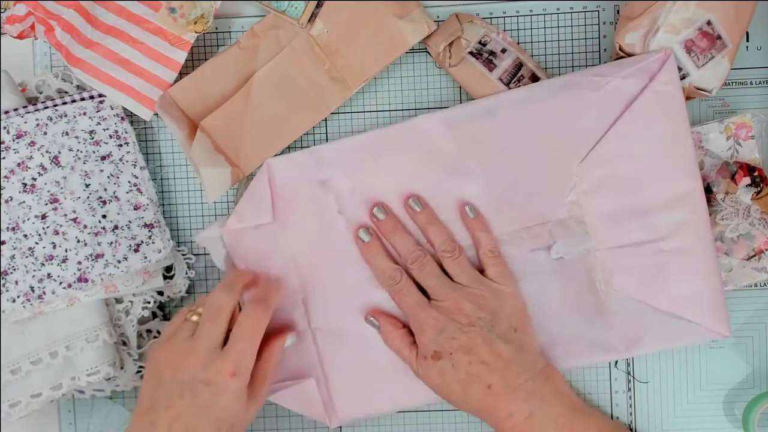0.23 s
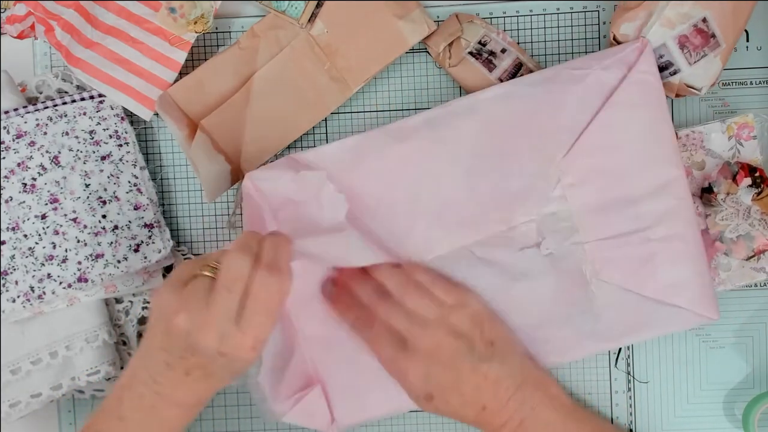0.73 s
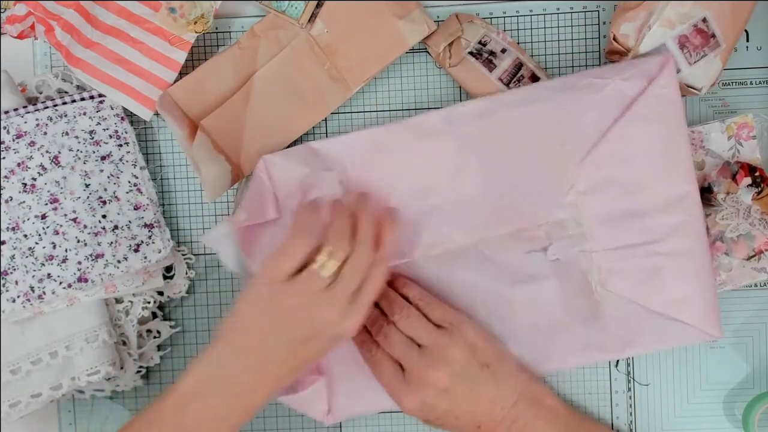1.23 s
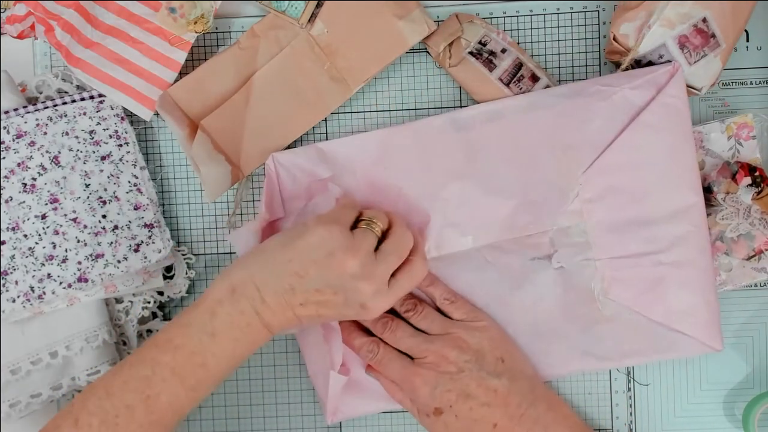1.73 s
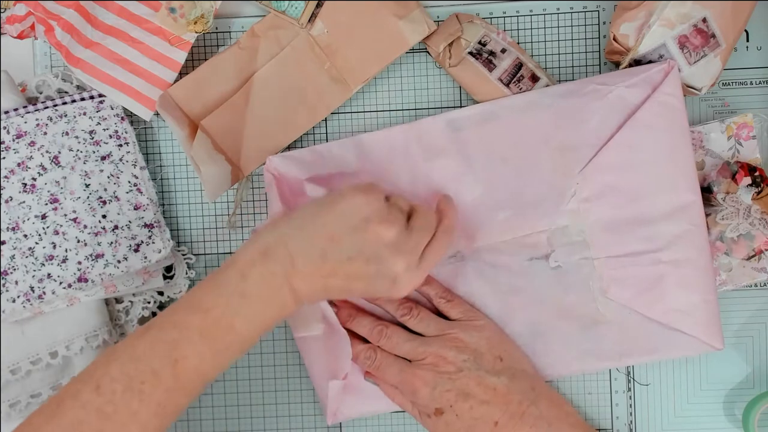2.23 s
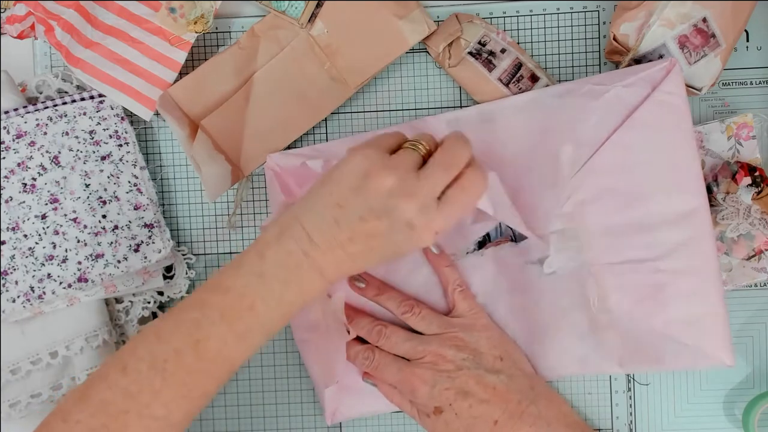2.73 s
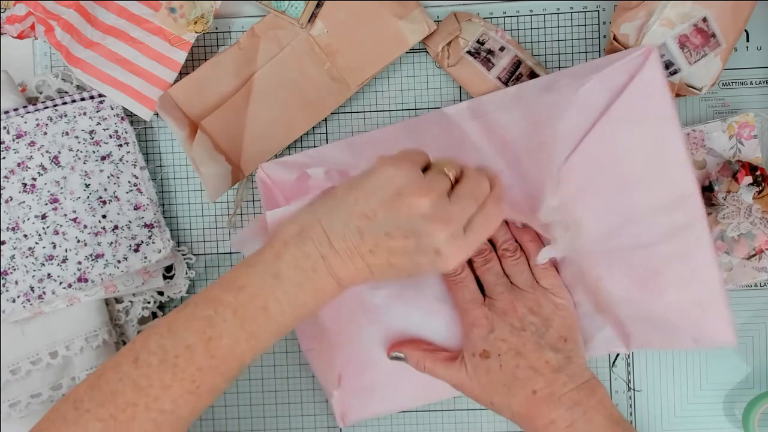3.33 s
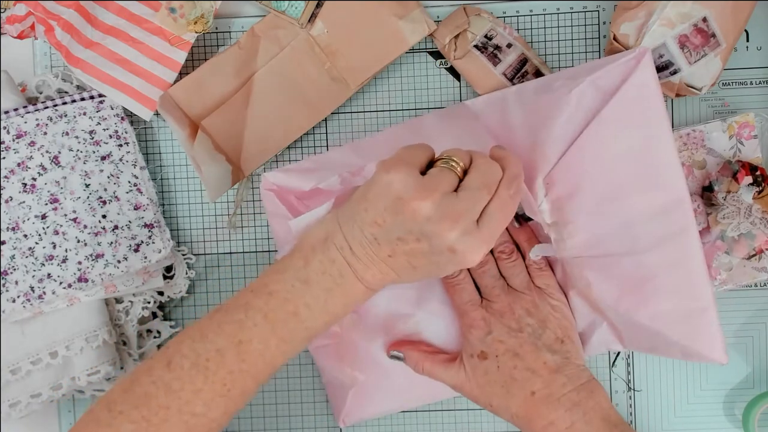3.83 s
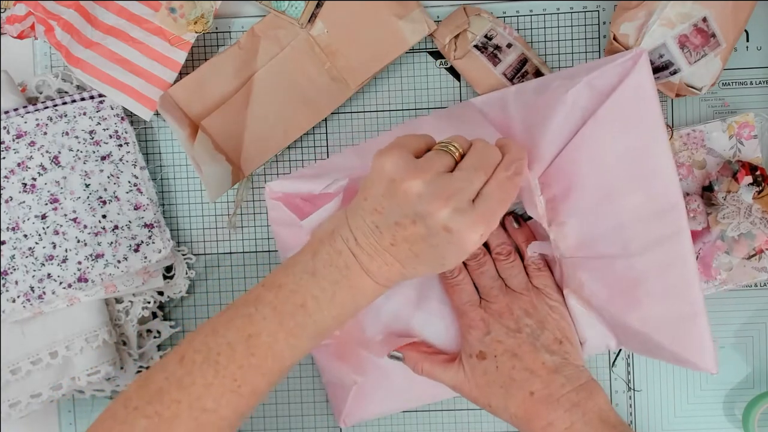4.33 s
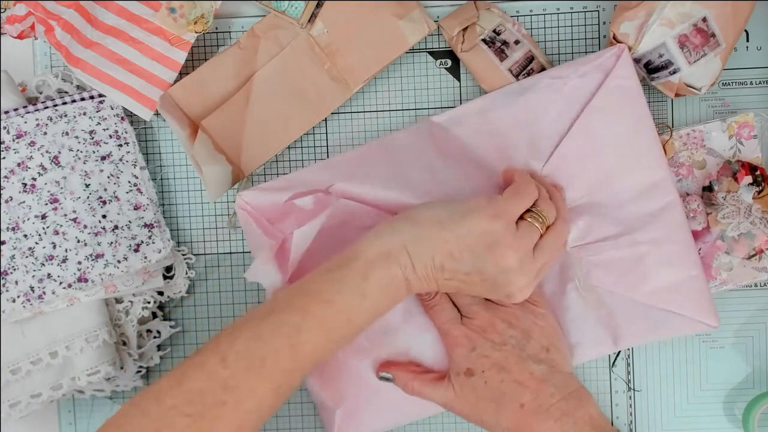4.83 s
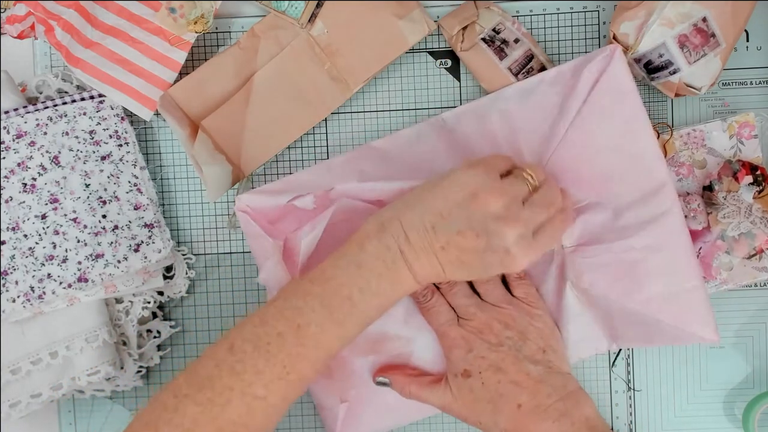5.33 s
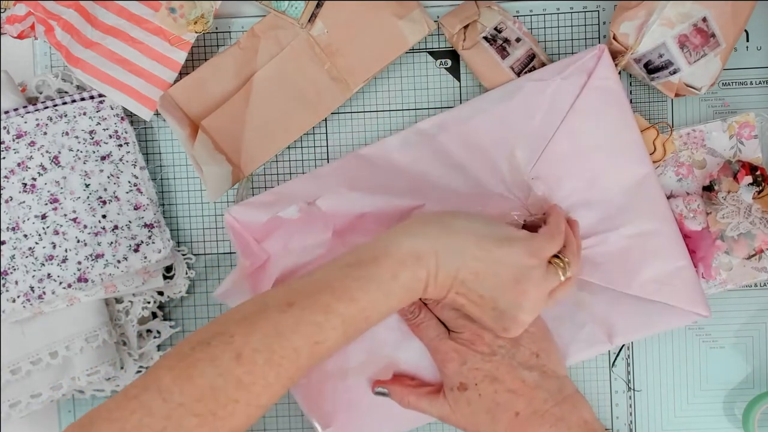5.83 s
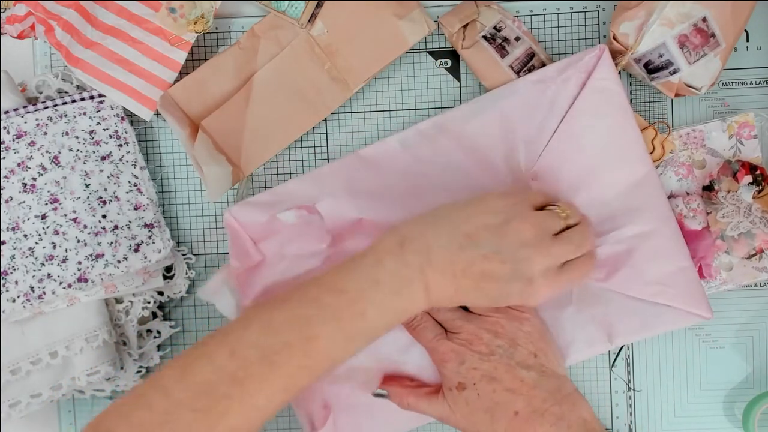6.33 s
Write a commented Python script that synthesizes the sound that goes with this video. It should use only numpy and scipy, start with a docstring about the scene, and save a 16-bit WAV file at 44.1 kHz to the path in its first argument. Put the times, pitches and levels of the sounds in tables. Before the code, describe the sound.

Close dry rustling of thin wrapping paper, sharp crease pops and quick tearing bursts, with a few low table bumps over faint room hiss.

```python
"""Hands crumple and tear thin tissue paper round a soft parcel on a table, in a quiet room.
Faint air noise and a low hum last throughout. Short rustles begin at once, and larger creases soon snap.
Each crease that flips is a burst of tiny clicks: a crisp tick and a duller pop from the sheet around it.
From 0.7 s hands now and then bump the table with a soft low thud of band-passed noise.
From 2.1 s a few steady pulls tear the sheet, their clicks fusing into a hiss that swells and eases."""
import sys
import numpy as np
from scipy import signal
from scipy.io import wavfile
from scipy.ndimage import uniform_filter1d

SR = 44100
rng = np.random.default_rng(int(sys.argv[2]) if len(sys.argv) > 2 else 0)


def boost_factor(decibels):
    """Convert a level in decibels to a linear amplitude factor."""
    exponent = np.asarray(decibels, float) / 20
    return 10 ** exponent


def generate_wav(signal):
    """Clip the signal to [-1, 1] and save it as 16-bit WAV at the path in sys.argv[1]."""
    frames = np.transpose(np.atleast_2d(signal))
    scaled = np.clip(frames, -1, 1) * 32767
    pcm = np.round(scaled).astype(np.int16)
    wavfile.write(sys.argv[1], SR, pcm)


N = 290266


def evened(x):
    """Normalization of a signal to unit rms."""
    return x / np.sqrt(np.mean(x ** 2) + 1e-20)


def shaped(x, points):
    """Minimum-phase filtering: the Hilbert transform of the log gain gives the phase of a causal filter."""
    hz, db = np.transpose(points)
    bin_hz = abs(np.fft.fftfreq(8192, 1 / SR))
    log_gain = np.log(boost_factor(np.interp(np.log(bin_hz + 1), np.log(hz), db)))
    spectrum = np.exp(np.conj(signal.hilbert(log_gain)))
    taps = np.fft.ifft(spectrum).real[:4096]
    if x.ndim > 1:
        taps = taps[None]
    return signal.oaconvolve(x, taps, axes=-1)[..., :x.shape[-1]]


def air():
    """Stationary broadband noise: steady room hiss, with a narrow band of noise as a wavering hum."""
    # spectrum of the quiet room air, in relative level: frequency_hz, level_db
    air_spectrum = [(25, -20), (110, -12), (160, -22.5), (210, -14.5), (930, -12.5), (8000, -28.5),
                    (15800, -59)]
    hum_band = signal.butter(N=2, Wn=(42, 60), btype="band", fs=SR, output="sos")
    hum = signal.sosfilt(hum_band, rng.standard_normal(N))
    hiss = shaped(rng.standard_normal(N), air_spectrum)
    return boost_factor(-62.5) * evened(hiss) + boost_factor(-82.0) * evened(hum)


def room(x, t60_s=0.071, first_s=.004):
    """Reverberation as sparse reflections of random sign; absorption makes the treble die first."""
    t = np.arange(SR // 2) / SR
    present = rng.random(len(t)) < 3000 / SR  # 3000 reflections per second
    reflections = present * rng.choice([-1., 1.], len(t)) * (t > first_s)
    soft = signal.lfilter([.4], [1, -.6], reflections)  # low-pass part
    treble = reflections - soft
    tail = soft * boost_factor(-60 * t / t60_s) + treble * boost_factor(-60 * t / (0.073 * t60_s))
    return signal.oaconvolve(x, tail / np.linalg.norm(tail))[:N]


def bumps(decay_s=0.017, rise_s=0.003):
    """Damped impact: a puff of noise, filtered to nearly an octave, rises softly and decays exponentially."""
    # hands bumping the parcel on the table: start_s, peak_db, pitch_hz
    bump_table = [(0.748, -38, 250), (0.769, -59, 99.6), (2.826, -32.5, 280), (3.407, -24.5, 350),
                  (3.413, -42.5, 98), (3.926, -30, 445), (4.04, -27.5, 555), (4.299, -31, 600),
                  (4.578, -31, 306), (4.775, -36, 203), (4.79, -55, 105), (4.97, -52, 105)]
    t, out = np.arange(8192) / SR, np.zeros(N + 8192)
    for start_s, peak_db, pitch_hz in bump_table:
        envelope = (1 - np.exp(-t / rise_s)) * np.exp(-t / decay_s)
        puff = envelope * rng.standard_normal(len(t))
        edges_hz = (0.81 * pitch_hz, 1.48 * pitch_hz)
        band = signal.butter(N=2, Wn=edges_hz, btype="band", fs=SR, output="sos")
        thud = signal.sosfilt(band, puff)
        out[round(start_s * SR):][:len(t)] += boost_factor(peak_db) * thud / abs(thud).max()
    return out[:N]


def sparse(shape, spread_db):
    """Heavy-tailed impulse statistics: clicks of random sign, most small and a few large."""
    return rng.standard_normal(shape) * boost_factor(spread_db * np.minimum(rng.exponential(1, shape), 5))


def patchy(x, depth_db, size, drift):
    """Time-varying filtering: random humps over pitch drift, giving each crease its own colour.
    size is the window in samples, drift the smoothing in frames."""
    z = signal.stft(x, nperseg=size)[2]
    humps = uniform_filter1d(rng.standard_normal(z.shape), size=3, axis=-2)  # along pitch
    humps = uniform_filter1d(humps, drift, -1)  # along time
    return signal.istft(z * boost_factor(depth_db * evened(humps)), nperseg=size)[1][..., :x.shape[-1]]


def dull_and_crisp(clicks, split_hz=2200):
    """Band splitting of two coloured rows: the first keeps the low pop, the second the high tick."""
    # colour of paper, table reflections and microphone, in relative level: frequency_hz, level_db
    colour = [(110, -47), (200, -20), (400, -7.5), (590, -10.5), (860, 8), (1120, 5), (1370, -1.5),
              (1690, 9), (1900, 0.5), (2290, 7), (2800, 6), (9600, 1), (15800, -22)]
    low, high = shaped(clicks, colour)
    low = signal.sosfilt(signal.butter(N=4, Wn=split_hz, fs=SR, output="sos"), low)
    high = signal.sosfilt(signal.butter(N=4, Wn=split_hz, btype="high", fs=SR, output="sos"), high)
    return low, high


def snaps(rise_s=0.00021, tick_share=1.0, crack=2.8, crack_s=0.00018):
    """Buckling of a crease: a sharp crack leads a decaying burst of clicks; louder pops ring longer."""
    # big creases, rms over their first 10 ms: start_s, dull_pop_db, crisp_tick_db
    snap_table = [(0.1903, -68, -34.5), (0.2482, -71, -28), (0.5363, -50, -20.5), (0.564, -22.5, -13.5),
                  (0.63, -30.5, -36), (0.7054, -37.5, -26), (0.8897, -31.5, -42), (1.0712, -45, -40),
                  (1.098, -55, -36.5), (1.2183, -30, -37), (1.2998, -42, -28), (1.3963, -39, -46),
                  (1.4488, -28.5, -26), (1.4785, -31.5, -38), (1.6182, -36, -24.5), (1.6401, -33, -13.5),
                  (1.6903, -40, -39), (1.75, -54, -21), (1.8957, -21.5, -25), (1.904, -30, -22.5),
                  (1.9176, -46, -22), (1.9477, -50, -29), (1.9597, -29, -26), (2.0071, -27.5, -21),
                  (2.1814, -31, -19), (2.2207, -43, -26.5), (2.249, -28, -25), (2.272, -21.5, -21.5),
                  (2.3414, -36, -26.5), (2.41, -34, -23), (2.5635, -33.5, -26.5), (2.6774, -30, -16),
                  (2.739, -35, -32.5), (2.9576, -42, -32), (2.9776, -27, -33), (3.042, -37, -36),
                  (3.1423, -29.5, -22.5), (3.2313, -29.5, -30.5), (3.35, -18.5, -18), (3.374, -24, -20),
                  (3.3889, -20, -15.5), (3.4163, -15.5, -16), (3.4919, -20, -20.5), (3.5275, -32, -20.5),
                  (3.538, -23, -19), (3.548, -24.5, -21), (3.6729, -28, -27), (3.831, -28, -41),
                  (3.9223, -29, -33), (4.0001, -36, -28.5), (4.02, -33, -42), (4.0396, -29, -42),
                  (4.1155, -55, -36.5), (4.207, -57, -35), (4.2989, -22.5, -22.5), (4.701, -28, -37),
                  (4.8198, -19.5, -21.5), (4.867, -41, -34), (4.9156, -33, -30.5), (4.957, -24.5, -25),
                  (5.0097, -20.5, -18), (5.174, -32, -38), (5.2345, -53.5, -33.5), (5.383, -22, -26.5),
                  (5.4047, -42, -28), (5.5333, -40, -23.5), (5.6271, -74, -38), (5.6706, -42, -54),
                  (5.8317, -37.5, -26.5), (5.958, -39.5, -30), (6.0266, -29, -28), (6.035, -31.5, -23),
                  (6.138, -34, -29.5), (6.257, -46, -30.5), (6.4053, -24.5, -30), (6.5187, -56, -35)]
    usual_s, usual_pop_db = 0.0035, -25  # decay of a crease with the usual pop
    doubling_db = 29  # a pop this much louder lasts twice as long
    t, out = np.arange(4096) / SR, np.zeros(N + 4096)
    for start_s, dull_db, crisp_db in snap_table:
        pop_s = usual_s * 2 ** ((dull_db - usual_pop_db) / doubling_db)
        decay_s = pop_s * np.array([[1], [tick_share]])  # rows: pop, tick
        envelope = (1 - np.exp(-t / rise_s)) * (np.exp(-t / decay_s) + crack * np.exp(-t / crack_s))
        burst = envelope * sparse((2, len(t)), 2.43)
        parts = dull_and_crisp(patchy(burst, 2.6, size=128, drift=12))
        for part, db in zip(parts, (dull_db, crisp_db)):
            first_rms = np.sqrt(np.mean(part[:441] ** 2))  # 10 ms
            out[round(start_s * SR):][:len(t)] += boost_factor(db) * part / first_rms
    return out[:N]


def handling(t):
    """Energy summation of the gestures into a rustle level in dB and the dull share of its amplitude.
    Every crumple starts suddenly, holds and fades alike; tears swell and ease in an arch."""
    # squeezes or pulls, slack broad folds sounding duller; dull part relative to the rustle:
    # start_s, length_s, rustle_db, dull_part_db
    crumples = [(0, 0.026, -30, -9), (0.109, 0.15, -45, -12), (0.246, 0.024, -33.5, -10),
                (.29, 0.12, -45.5, -30), (0.391, .06, -34.5, -14.5), (0.54, .125, -27.5, -7),
                (0.698, 0.081, -25, -2.5), (0.81, 0.098, -38, -2.5), (0.963, 0.075, -32.5, -4),
                (1.059, 0.15, -40.5, -8), (1.198, 0.15, -30.5, -3.5), (1.4, 0.19, -33, -6.5),
                (1.635, 0.042, -22, -5.5), (1.736, 0.016, -27.5, -3), (1.802, 0.12, -32, -6.5),
                (1.896, .125, -25, -9), (2.107, 0.039, -31.5, -3), (2.19, 0.15, -24.5, -6),
                (2.37, 0.055, -32, -5), (2.471, 0.039, -39.5, -5.5), (2.593, .12, -23.5, -19),
                (2.764, 0.018, -29, -0.5), (2.88, 0.047, -44, -8), (2.954, 0.065, -40.5, -5),
                (3.048, 0.07, -45.5, -5.5), (3.14, 0.091, -31.5, -2.5), (3.272, 0.039, -24, -18),
                (3.442, 0.1, -27.5, -3), (3.6, 0.254, -35.5, -13.5), (3.902, 0.05, -32.5, -4),
                (3.98, 0.068, -39, -5), (4.098, 0.044, -41, -10), (4.18, 0.14, -36.5, -9),
                (4.35, 0.064, -45.5, -11.5), (4.487, 0.057, -44, 1.5), (4.618, 0.268, -29.5, -2.5),
                (4.939, 0.086, -24, -1.5), (5.038, 0.14, -32.5, -4.5), (5.201, 0.072, -42.5, -2),
                (5.381, 0.21, -34.5, -1.5), (5.63, 0.023, -55, -19), (5.792, 0.074, -38.5, -10),
                (5.931, 0.14, -37.5, -9), (6.018, 0.19, -32, -3), (6.199, 0.13, -37.5, -1),
                (6.392, 0.037, -35.5, -2), (6.521, 0.014, -37.5, -4.5)]
    # steady pulls that tear the sheet: middle_s, half_length_s, rustle_db, dull_part_db
    tears = [(2.166, 0.039, -18, -13), (2.654, 0.052, -14, -4), (2.83, 0.041, -25, -4),
             (3.362, 0.072, -18, -2.5), (4.576, 0.041, -23.5, -1.5)]
    grip_db_per_s, let_go_db_per_s, rest_db = 2500, 457, -63
    ends_db, flatness = -9.5, 2.2  # tear ends against the middle; a higher power holds the top longer
    shapes = []
    for start_s, length_s, level_db, dull_db in crumples:
        onset_db = grip_db_per_s * np.minimum(t - start_s, 0)
        fade_db = let_go_db_per_s * np.maximum(t - start_s - length_s, 0)
        shapes.append((level_db + onset_db - fade_db, dull_db))
    for middle_s, half_s, level_db, dull_db in tears:
        arch_db = ends_db * abs((t - middle_s) / half_s) ** flatness
        shapes.append((level_db + arch_db, dull_db))
    total = boost_factor(2 * rest_db) + sum(boost_factor(2 * db) for db, _ in shapes)
    dull = boost_factor(2 * rest_db) / 2 + sum(boost_factor(2 * (db + min(dull_db, 0))) for db, dull_db in shapes)
    return 10 * np.log10(total), np.sqrt(dull / total)


def rustle(per_s=100, spread_db=4.5, burst_s=0.0023, rise_s=0.00023, bed_db=-10, tear_db=-20, shared=0.69):
    """Crackling noise: small creases come at random, each a burst of clicks that dies in milliseconds."""
    t = np.arange(N) / SR
    level_db, share = handling(t)
    sizes = boost_factor(2 * spread_db * np.minimum(rng.exponential(1, (3, N)), 3))
    starts = (rng.random((3, N)) < per_s / SR) * sizes
    power = shared * starts[0] + (1 - shared) * starts[1:]  # many creases both pop and tick
    for lag_s in (rise_s, burst_s):
        power = signal.lfilter([1], [1, -np.exp(-1 / (lag_s * SR))], power)
    fused = boost_factor(2 * (level_db - tear_db))  # hard tearing fuses into a hiss
    power = power / power.mean() + boost_factor(2 * bed_db) + fused
    power /= uniform_filter1d(power, int(.06 * SR))  # the hands set the slow level
    clicks = np.sqrt(power) * sparse((2, N), 3.2 / (1 + fused))
    clicks = clicks * (1 + 0.37 * fused / (1 + fused))
    pops, ticks = patchy(clicks, 2.52, size=128, drift=8)
    pops = patchy(pops, 4.1, size=512, drift=6)  # air pockets between the layers ring briefly
    ticks = patchy(ticks, 1.8, size=512, drift=6)
    dull, crisp = dull_and_crisp(np.array([pops, ticks]))
    share = np.clip(share, 0, .97)
    return boost_factor(level_db) * (share * evened(dull) + np.sqrt(1 - share ** 2) * evened(crisp))


def scene():
    """Superposition of paper and bumps, their reverberation in the room, and the air."""
    near = rustle() + snaps() + bumps()
    return (near + boost_factor(-14.5) * room(near) + air())[None]


def band_limit(x):
    """A steep low-pass at the top of the band."""
    return signal.sosfilt(signal.butter(12, 16510, fs=SR, output="sos"), x)


def record(dry):
    """Amplitude and band limits: the input clips at its ceiling, then a linear-phase low-pass follows."""
    ceiling, edge_hz = .9, 15950
    clipped = np.clip(dry, -ceiling, ceiling)
    low_pass = signal.firwin(511, edge_hz, window=("kaiser", 9), fs=SR)
    limited = signal.oaconvolve(clipped, low_pass[None], "same")
    return band_limit(limited)


dry = scene()
out = record(dry)
generate_wav(out)
```